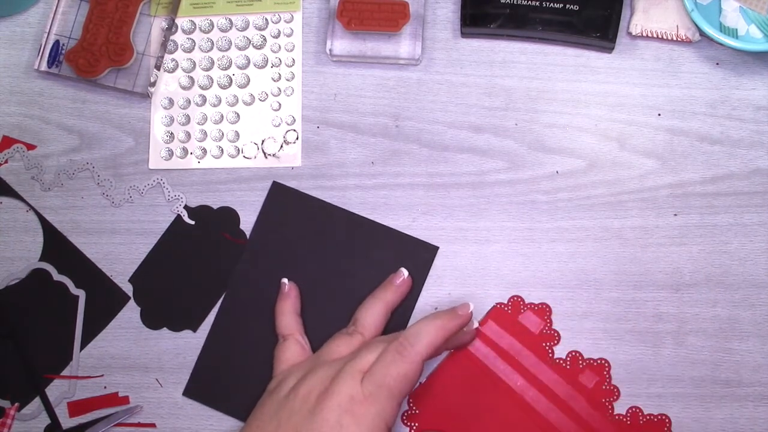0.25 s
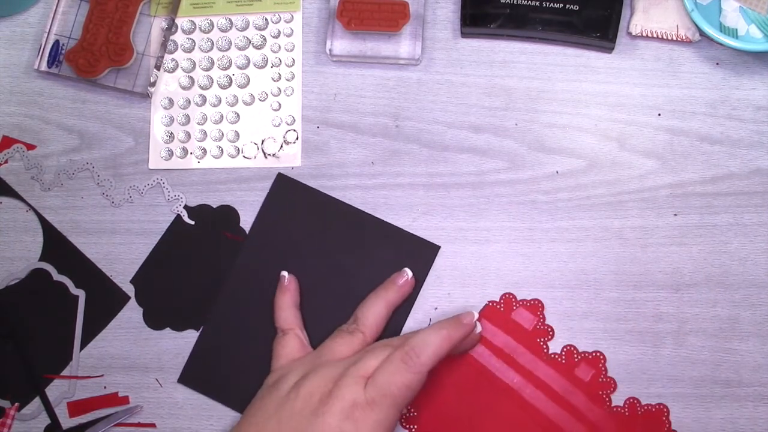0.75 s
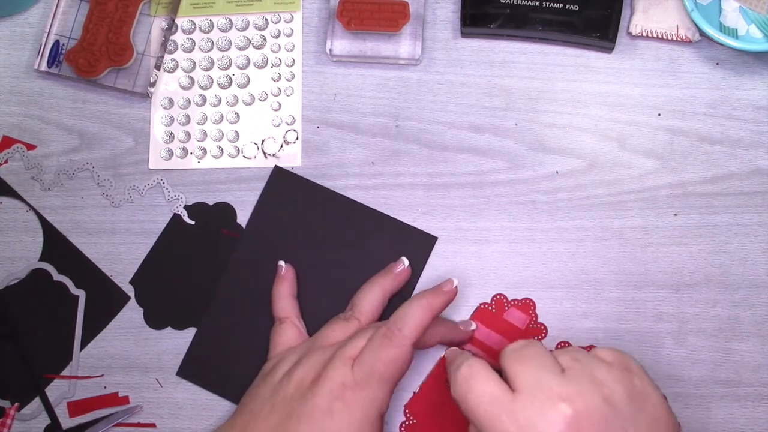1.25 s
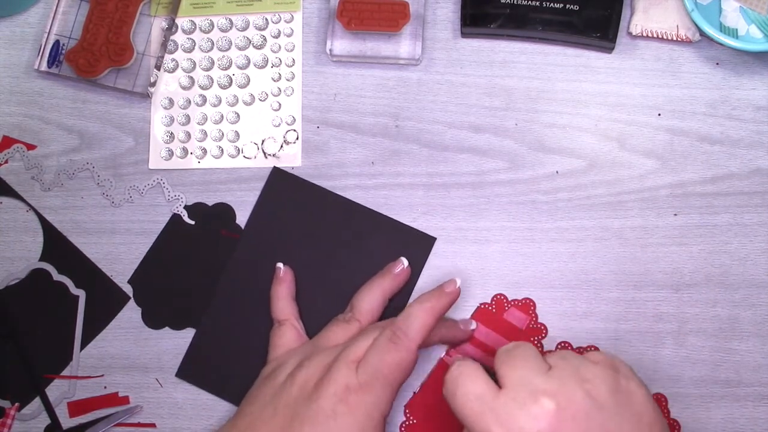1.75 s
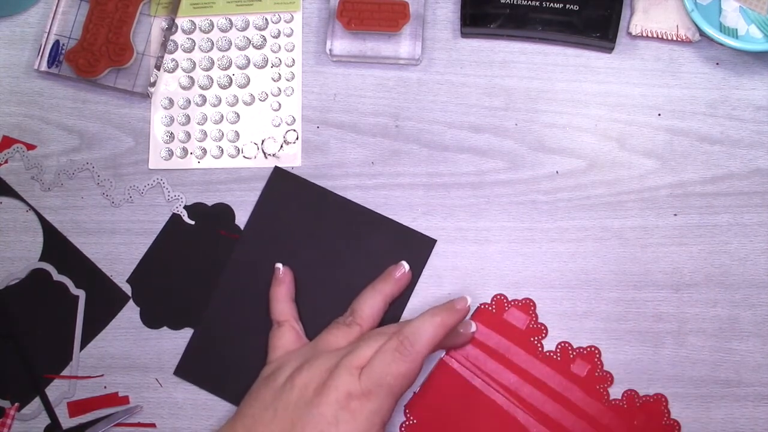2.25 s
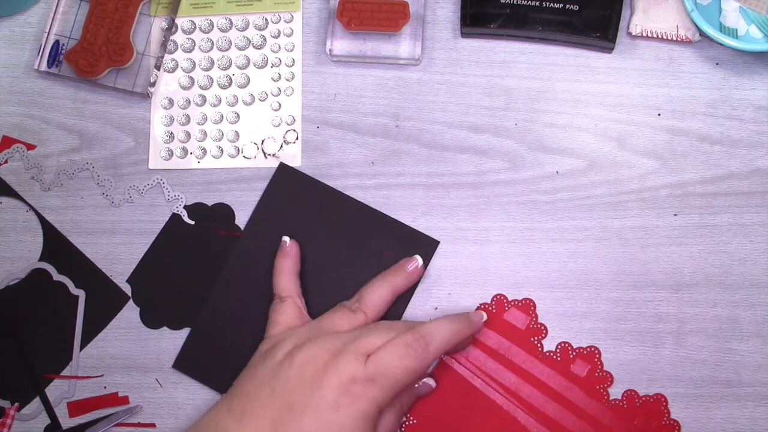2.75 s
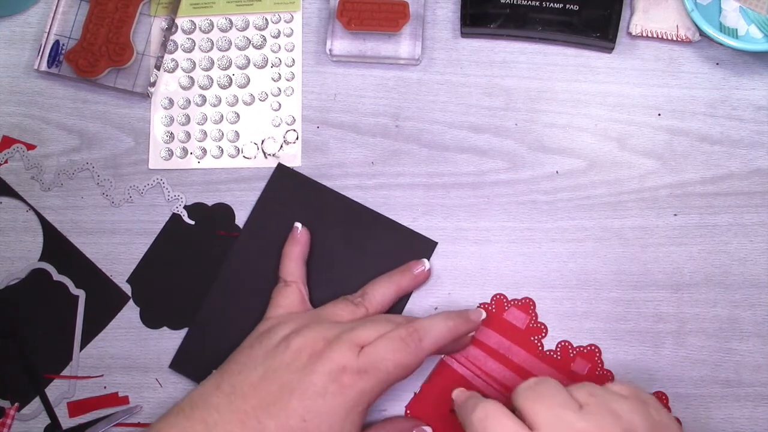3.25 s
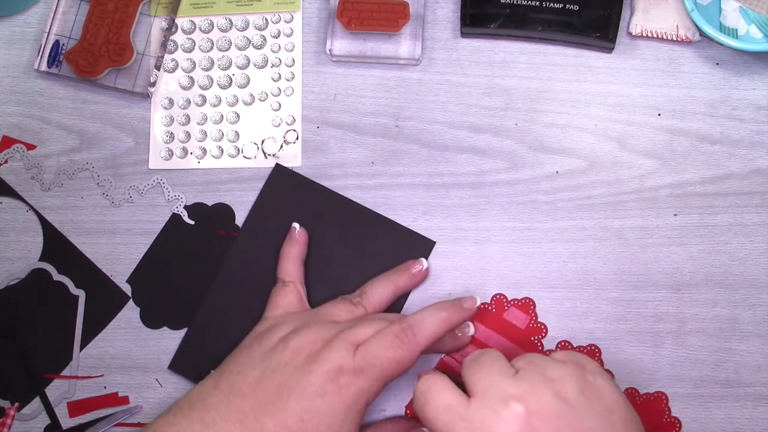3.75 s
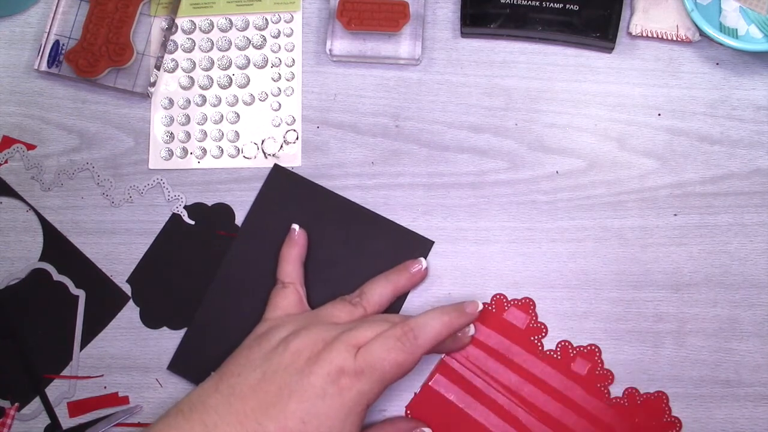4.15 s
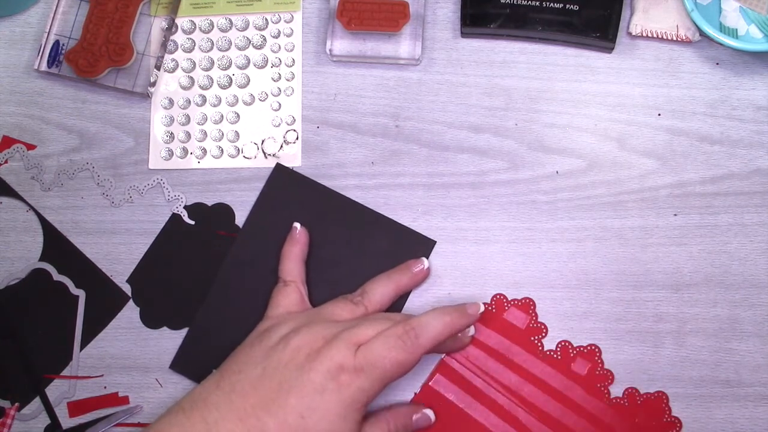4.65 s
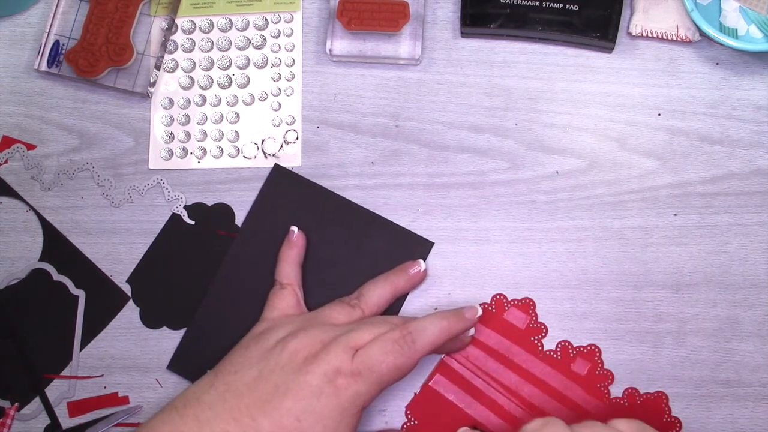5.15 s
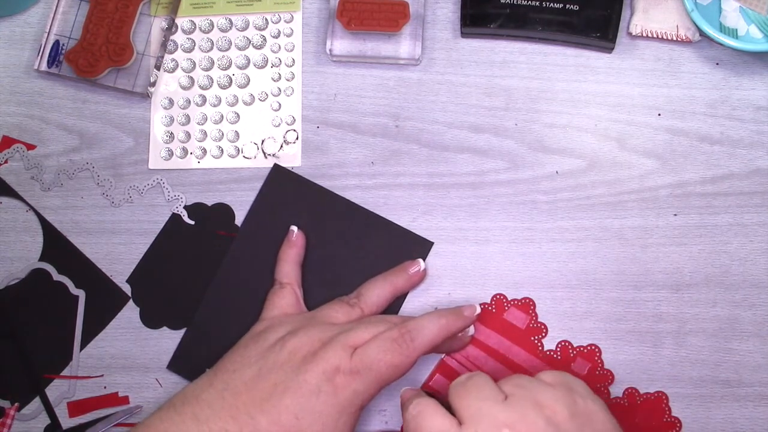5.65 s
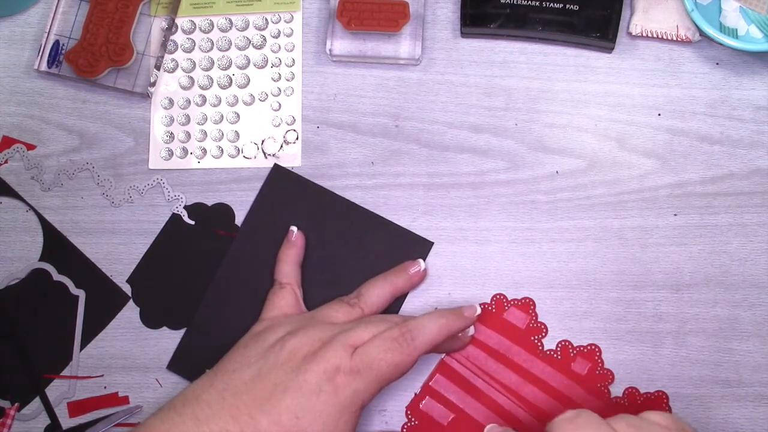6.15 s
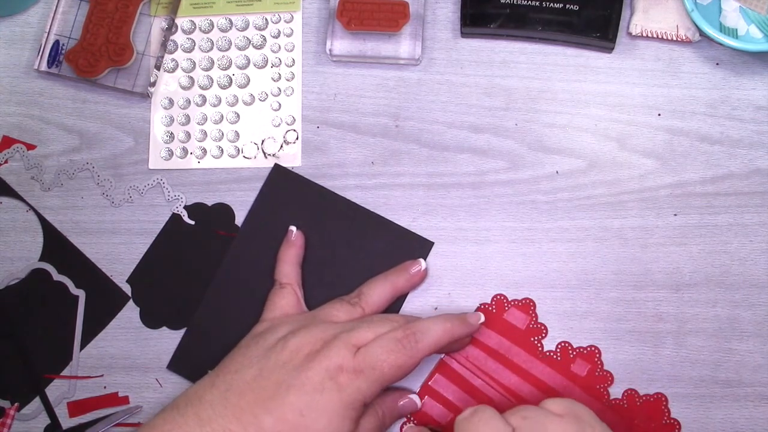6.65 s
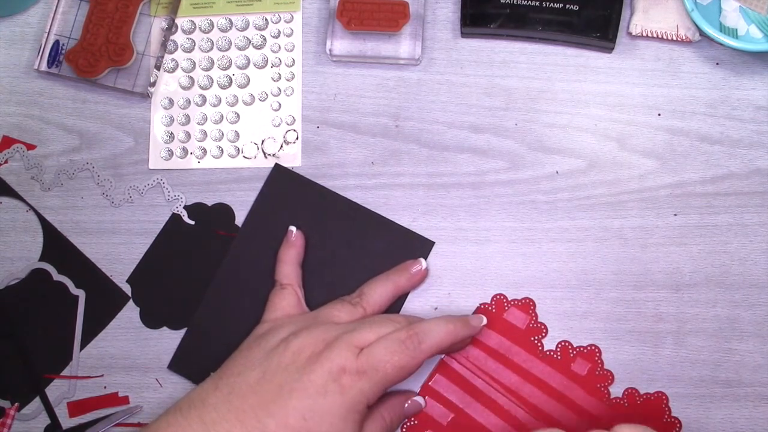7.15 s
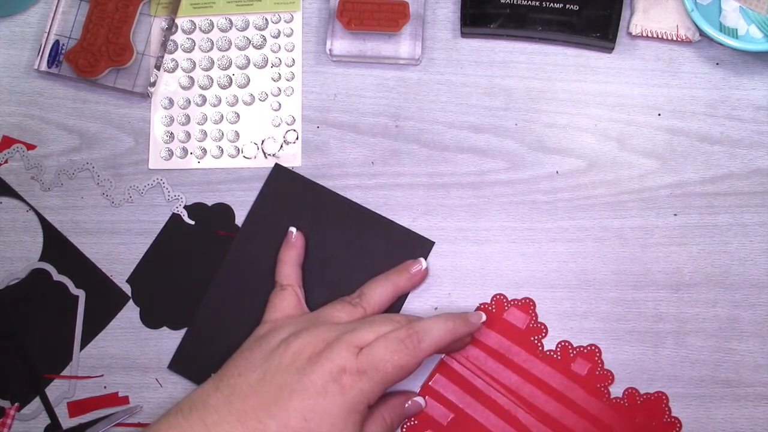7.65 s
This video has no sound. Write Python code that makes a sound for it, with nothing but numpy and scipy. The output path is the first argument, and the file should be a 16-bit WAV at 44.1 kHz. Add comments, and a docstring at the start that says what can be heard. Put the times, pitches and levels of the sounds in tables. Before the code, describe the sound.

A plastic tape runner is already mid-pull, its ratchet buzz slowing to a few clicks, then a hard tap. Two longer rasping pulls follow, each winding down into spaced snaps, then a very short burst. Light ticks and paper rustles fill the gaps, and a pair of hard taps comes near the end. Close stereo microphones, small room, low steady ventilation.

```python
"""A fast ratchet buzz is already running, over a ventilation drone and a faint stepping tick; it ends within 0.4 s.
More pulls follow as a plastic tape runner rolls over paper on a table below a camera's two close microphones.
Its pawl snaps tooth by tooth: uneven little blows ring the modes of the hollow case, with a treble crack.
Ticks, rustles and hard taps sound as it is set down and lifted; shaped noise makes rolling, hiss and drone.
A small room answers with dense noise tails."""
import sys
import numpy as np
from scipy import signal
from scipy.fft import rfft, irfft
from scipy.io import wavfile
from scipy.ndimage import uniform_filter1d

SR = 44100
rng = np.random.default_rng(int(sys.argv[2]) if len(sys.argv) > 2 else 0)


def output_pcm(signal):
    """Save a mono or channel-first signal as 16-bit PCM at the path in sys.argv[1].

    Samples are clipped to [-1, 1] before scaling.
    """
    pcm = np.clip(np.atleast_2d(signal).T, -1, 1) * 32767
    wavfile.write(sys.argv[1], SR, np.round(pcm).astype(np.int16))


N = 348390  # length in samples
GRAIN = 2048  # length of one struck sound in samples


def undb(db):
    """Amplitude factor of a level in dB."""
    return 10 ** (np.asarray(db) / 20)


def level(x, db):
    """Sets the RMS level of a signal."""
    return x * undb(db) / np.sqrt(np.mean(x ** 2))


def curve(rows):
    """A (t/s, value) table at every sample."""
    return np.interp(np.arange(N) / SR, *np.transpose(rows))


def on_log(rows, hz):
    """A (f/Hz, value) table read on a log-frequency axis."""
    f, value = np.transpose(rows)
    return np.interp(np.log(np.maximum(hz, 1)), np.log(f), value)


def band(x, lo_hz, hi_hz, order=2):
    """Keeps the band between two frequencies."""
    sos = signal.butter(order, [lo_hz, min(hi_hz, .49 * SR)], "bandpass", fs=SR, output="sos")
    return signal.sosfilt(sos, x)


def walk(rate):
    """Random values, rate per second, joined by slewing; spread near 1."""
    hold = int(SR / rate)
    steps = np.repeat(rng.standard_normal(N // hold + 1), hold)
    return 1.2 * uniform_filter1d(steps, hold)[:N]


# spectrum of the ventilation drone: (f/Hz, relative level/dB per Hz)
DRONE_SPECTRUM = [(20, -50), (40, -24), (69, -29), (89, -6), (109, -1), (130, -8), (204, -10), (354, -10),
                  (600, -16), (965, -18), (1550, -25), (2770, -28.5), (5000, -36.5), (11300, -53.5),
                  (16000, -85)]
# left-right likeness of the drone: (f/Hz, likeness 0-1)
DRONE_LIKENESS = [(30, 0.54), (80, 0.98), (130, 0.99), (290, 0.7), (640, 0.62), (1400, 0.64), (3100, 0.5),
                  (15000, 0.52)]


def drone():
    """Ventilation: coloured noise, its left-right likeness set by frequency, under a thin high whine."""
    f = np.arange(N // 2 + 1) * SR / N
    alike = np.clip(on_log(DRONE_LIKENESS, f), 0, 1)
    colour = undb(on_log(DRONE_SPECTRUM, f))
    mid, side = rfft(rng.standard_normal((2, N))) * colour * np.sqrt([1 + alike, 1 - alike])
    air = irfft(np.array([mid + side, undb(0.7) * (mid - side)]), N)
    whine_hz = 11050
    whine = band(rng.standard_normal(N), whine_hz - 90, whine_hz + 90)
    return level(air, -53.5) * undb(0.35 * walk(2.88)) + level(whine, -82)


# runs of the stepping tick: (first t/s, last t/s, nominal peak level/dB)
STEP_RUNS = [(.94, 1.22, -50), (3.27, 3.63, -49.5), (5.2, 5.56, -51.5), (6.07, 6.45, -59),
             (6.54, 6.6, -47.5)]


def ticker():
    """Perhaps a lens motor: even clicks near 2.7 kHz; each run starts with a stronger one."""
    start_s, period_s = .0107, .06673
    clicks = np.zeros(N)
    s = np.arange(start_s, N / SR, period_s)
    size = undb(1.4 * rng.standard_normal(len(s)))
    for first, last, db in STEP_RUNS:
        on = (s > first) & (s < last)
        opening_db = 3.8 * (s[on] < first + period_s)
        clicks[(s[on] * SR).astype(int)] = size[on] * undb(db + opening_db)
    one_click = band(np.eye(1, 200)[0], 2300, 3200)
    return band(clicks, 2300, 3200) / np.abs(one_click).max()


# fading of the room, band by band: (centre f/Hz, time to fall 60 dB t/s, relative level/dB)
ROOM_BANDS = [(1513, 0.29, -5.5), (2810, 0.28, -9.5), (4930, 0.37, -6), (8400, 0.33, -11),
              (12700, 0.32, -17.5)]


def room(x, gap_s, apart_db):
    """Dense reflections after a short gap, fading band by band; the close ports hear them nearly alike."""
    t = np.arange(SR // 2) / SR
    onset = np.clip(2 * t / gap_s - 1, 0, 1)  # silent to half the gap, full at its end
    tails = 0
    for hz, t60, db in ROOM_BANDS:
        noise = band(rng.standard_normal((2, len(t))), hz / 1.25, hz * 1.216)
        noise *= np.exp(-np.log(1000) * t / t60) * onset
        tails = tails + undb(db) * noise / np.sqrt(np.sum(noise[0] ** 2) * SR / hz)
    # the ports are set apart around 5.5 kHz
    side = undb(apart_db) * band(tails[1], 4600, 6600)
    return signal.fftconvolve(x[None], [tails[0] + side, tails[0] - side], axes=1)[:, :N]


def diffuse(x, share, flutter_hz):
    """Random flutter on the sound sent to the room, so narrow rings give diffuse tails."""
    share = np.clip(share, 0, 1)
    flutter = level(band(rng.standard_normal(N), 28, flutter_hz), 0)
    return x * (np.sqrt(1 - share) + np.sqrt(share) * flutter)


def ports(x, apart_db):
    """Short waves scatter round the camera body, so the two ports differ a little in the treble."""
    t = np.arange(256) / SR
    scatter = band(rng.standard_normal(len(t)) * np.exp(-t / 0.00043), 3100, 15000)
    scatter /= np.sqrt(np.sum(scatter ** 2))
    side = signal.fftconvolve(x, scatter)[:N] * undb(apart_db)
    return np.array([x + side, x - side])


# soft hiss, perhaps a hand sliding over the paper: (t/s, lower band level/dB, upper band level/dB)
SLIDE_LEVELS = [(0, -53, -57), (.8, -68.5, -64.5), (1.05, -58, -63), (1.3, -69, -67.5), (2.95, -64, -67),
                (3.2, -65.5, -64), (3.45, -69, -68), (4.9, -72, -67), (5.2, -58.5, -65), (5.45, -69, -68.5),
                (6.1, -73, -67.5), (7.9, -79, -68.5)]


def slide():
    """Soft hiss: two bands of noise that follow drawn levels and flicker a little."""
    s, low_db, high_db = np.transpose(SLIDE_LEVELS)
    soft = level(band(rng.standard_normal(N), 790, 1670), 0) * undb(curve(np.c_[s, low_db]))
    airy = level(band(rng.standard_normal(N), 1300, 7200, order=1), 0) * undb(curve(np.c_[s, high_db]))
    return (soft + airy) * undb(0.76 * walk(30))


def roller(s, rumble_db, rub_db):
    """Low rumble through the table and a rub on the paper, stronger the faster the teeth pass."""
    passing = np.zeros(N)
    passing[(np.maximum(s, 0) * SR).astype(int)] = 1
    smooth = uniform_filter1d(uniform_filter1d(passing, size=2600), size=2600)
    teeth_per_s = np.abs(smooth) * SR
    rumble = level(band(rng.standard_normal(N), 137, 423), rumble_db)
    rub = level(band(rng.standard_normal(N), 610, 1010), rub_db)
    # the two levels are those at 70 teeth per second
    return (rumble + rub) * (teeth_per_s / 70) ** 0.82 * undb(2.0 * walk(40))


def contact(count, chatter_s, rattle, spike_db):
    """A few ms of uneven little blows, then a weak after-rattle; the sum drives all frequencies nearly alike."""
    t = np.arange(GRAIN // 2) / SR
    chance = rng.standard_normal((count, 2 * len(t) + 1))
    length = chatter_s * np.exp(.22 * chance[:, [-1]])
    fall = np.exp(-(t / length) ** 2) + rattle * np.exp(-t / 0.0088)
    shape = (1 - np.exp(-t / 0.00089)) * fall
    blows = chance[:, :len(t)] * undb(spike_db * chance[:, len(t):-1])
    push = rfft(shape * blows, GRAIN)
    push /= uniform_filter1d(np.abs(push) ** 2, size=24, axis=1) ** .35  # evens out the spectrum
    # lead-in of 128 samples keeps the rise of each blow whole
    return np.roll(irfft(push, GRAIN), 128, axis=1)[:, :GRAIN // 2]


def ring(push, modes, balance_db, stretch, scatter_db, detune):
    """Each push rings resonant modes with its own balance and slight detuning, scaled to one short-term peak."""
    hz, width, db = np.transpose(modes)
    count = len(hz)
    chance = rng.standard_normal((len(push), 2 * count))
    gain = undb(db + balance_db + scatter_db * chance[:, :count]) * (-1) ** np.arange(count)
    centre = hz * stretch[:, None] * (1 + detune * chance[:, count:])
    f = np.arange(GRAIN // 2 + 1) * SR / GRAIN
    response = 0
    for k in range(count):
        damping = width[k] * f
        response = response + gain[:, [k]] * damping / (damping + 1j * (f ** 2 - centre[:, [k]] ** 2))
    out = irfft(rfft(push, GRAIN) * response, GRAIN)
    power = uniform_filter1d(2 * out ** 2, size=90, axis=1)
    return out / np.sqrt(power.max(axis=1, keepdims=True))


# treble modes shared by every blow: (f/Hz, width/Hz, relative level/dB)
TREBLE_MODES = [(5500, 1600, 3.5), (7240, 640, 6), (8100, 510, 4), (10560, 1340, 1), (12500, 2240, -1.5)]


def place(table, push, body):
    """Adds the treble ring to the body ring and puts each blow at its moment."""
    s, db, rel_db, _ = np.transpose(table)
    treble = ring(push, TREBLE_MODES, 0, 1 + 0 * s, scatter_db=1.5, detune=0.027)
    grains = undb(db)[:, None] * (body + undb(rel_db)[:, None] * treble)
    out = np.zeros(N + 2 * GRAIN)
    starts = ((s - .0008) * SR).astype(int) + GRAIN - 128
    for start, grain in zip(starts, grains):
        out[start:start + GRAIN] += grain
    # the case is too small to radiate below its first mode
    sos = signal.butter(5, 1130, "highpass", fs=SR, output="sos")
    return signal.sosfiltfilt(sos, out[GRAIN:GRAIN + N])


# modes of the hollow case: (f/Hz, width/Hz, relative level/dB)
CASE_MODES = [(1242, 171, 2), (1335, 162, 2), (1482, 142, 3), (1860, 235, -6.5), (2214, 135, -6),
              (3010, 298, -4.5), (3800, 350, -5), (4528, 183, -6)]
# starts of the pulls, the first before the sound begins: (t/s)
PULL_STARTS = [-.35, 1.65, 3.74, 5.75]


def case(table, chatter_s, rattle, spike_db):
    """Blows on the case; a higher centre leans the modes upward, and those near 2 kHz swell along a pull."""
    s, centre_hz = np.array(table)[:, [0, 3]].T
    octave = np.log2(np.array(CASE_MODES)[:, 0] / 2100)
    pull_start = np.array(PULL_STARTS)[np.searchsorted(PULL_STARTS, s) - 1]
    along = np.clip((s - pull_start) / 0.41, 0, 1)
    lean_db = 13.2 * np.outer(np.log2(centre_hz / 2150), octave)
    swell_db = 14.4 * np.outer(along - .5, np.exp(-(octave / 0.44) ** 2))
    push = contact(len(table), chatter_s, rattle, spike_db)
    body = ring(push, CASE_MODES, lean_db + swell_db, 1 + 0 * s, scatter_db=1.9, detune=0.027)
    return place(table, push, body)


# rustles of paper: (start t/s, end t/s, tick level/dB, treble minus body level/dB)
PAPER_RUSTLES = [(.83, 0.887, -50, -14), (1.51, 1.566, -42, -15), (2.76, 2.87, -49.5, -10),
                 (4.682, 4.78, -43, -6), (5.958, 6.018, -41.5, -8), (6.778, 6.838, -49, -16),
                 (6.919, 6.98, -44, -8), (7.027, 7.08, -48, -4), (7.797, 7.846, -50, -14)]


def rustle(scatter_db, centre_hz, spread_oct):
    """Paper: small ticks scattered at uneven moments inside each rustle, struck like the case."""
    per_s = 70
    rows = []
    for start, end, db, rel_db in PAPER_RUSTLES:
        slots = np.arange(start, end, 1 / per_s)
        when, strong, high = rng.standard_normal((len(slots), 3)).T
        rows.append(np.c_[slots + np.tanh(when) / per_s / 2, db + scatter_db * strong,
                          rel_db + 0 * slots, centre_hz * 2 ** (spread_oct * high)])
    return case(np.vstack(rows), chatter_s=0.0025, rattle=0.18, spike_db=3.0)


# light ticks of case and paper: (t/s, level/dB, treble minus body level/dB, centre of the body ring f/Hz)
LIGHT_TICKS = [(.6124, -29, -6.5, 3270), (.6325, -33, -20, 3120), (.847, -41.5, -11, 2090),
               (.9888, -46.5, -11, 2830), (1.3741, -44, -13, 1980), (1.5408, -33, -10, 1700),
               (1.6258, -32, -19, 1428), (1.646, -31, -19, 1850), (1.6755, -28, -11, 1840),
               (2.646, -36.5, -6.5, 3260), (2.6771, -39, -14, 3200), (2.7109, -36, -10, 2080),
               (2.7414, -34, -8.5, 2360), (2.7639, -35, -12, 1960), (2.7813, -35, -5.5, 2130),
               (2.8039, -37, -12, 2030), (2.9478, -38.5, -9, 2400), (2.9696, -42, -7, 2590),
               (3.7085, -35.5, -16, 1560), (4.6724, -32.5, -9.5, 3400), (4.6866, -37, -20, 3060),
               (4.7368, -40, -3, 2530), (4.7526, -40, -20, 1960), (4.8529, -43.5, -14, 1874),
               (5.6265, -38.5, -10, 3330), (5.678, -29.5, -11, 1840), (5.7153, -33, -14, 1700),
               (5.7444, -31, -12, 2450), (5.933, -29.5, -31, 1760), (6.738, -50.5, -15, 3000),
               (6.8151, -38.5, -30, 1805), (6.8271, -48, -25, 3100), (6.8959, -38, -4, 2910),
               (7.047, -43, 1, 2600), (6.9581, -34, -1, 2720), (7.5168, -43, -5, 2560),
               (7.6127, -36.5, -10, 1765), (7.822, -48, -2, 2510)]


def ticks():
    """Light ticks: short chatter with little after-rattle rings the case."""
    return case(LIGHT_TICKS, chatter_s=0.0021, rattle=0.11, spike_db=4.0)


# modes of a hard tap before scaling to its main ring: (f/Hz, width/Hz, relative level/dB)
TAP_RING = [(1970, 186, 3), (1480, 270, -14.5), (3700, 250, -9.5), (4460, 400, -10.5)]
# single hard taps: (t/s, level/dB, treble minus body level/dB, main ring f/Hz)
HARD_TAPS = [(0.6519, -15.5, -8, 1550), (7.021, -29.5, 3.5, 3820), (7.6396, -13.5, -14, 1855),
             (7.6788, -14, -14.5, 1940)]


def taps():
    """Hard taps: very short chatter, a narrow main ring and three weaker ones."""
    main_hz = np.array(HARD_TAPS)[:, 3]
    push = contact(len(HARD_TAPS), chatter_s=0.0014, rattle=0.092, spike_db=3.0)
    body = ring(push, TAP_RING, 0, main_hz / TAP_RING[0][0], scatter_db=2.0, detune=0)
    return place(HARD_TAPS, push, body)


# turning of the ratchet wheel, one table for each of the three running pulls: (t/s, teeth turned)
WHEEL_TURNS = [
    [(-.006, 0), (.0099, 1), (.0565, 4), (.151, 10), (.1687, 11), (.2285, 14), (.2754, 16)],
    [(1.7005, 0), (1.7326, 2), (1.7864, 5), (1.8015, 6), (1.8642, 11), (1.9657, 19), (2.0004, 22),
     (2.0678, 27), (2.0839, 28), (2.1577, 32), (2.1807, 33)],
    [(3.767, 0), (3.7849, 1), (3.8479, 5), (3.8844, 7), (3.9394, 11), (3.9577, 13), (4.0191, 18),
     (4.046, 20), (4.0987, 24), (4.129, 26), (4.1395, 27), (4.1615, 28), (4.2249, 31), (4.2612, 33)],
]
# running teeth along those pulls: (t/s, level/dB, treble crack level/dB, centre of the body ring f/Hz)
RUNNING_SOUND = [(0, -19.5, -27.5, 2320), (.07, -21.5, -29, 2400), (.135, -18.5, -29, 2570),
                 (.19, -23.5, -30, 2400), (.28, -24, -33.5, 2700), (1.7, -18.5, -29, 1770),
                 (1.77, -21, -29, 2230), (1.865, -17.5, -28, 2010), (1.96, -22, -29, 2250),
                 (2.05, -16.5, -28, 2000), (2.12, -17.5, -29.5, 2120), (2.18, -20, -29, 2120),
                 (3.77, -20.5, -31, 2200), (3.83, -20.5, -28.5, 2180), (3.867, -17, -28.5, 1750),
                 (3.92, -21.5, -27.5, 2250), (4.025, -16, -26.5, 1880), (4.1, -19.5, -26, 2200),
                 (4.17, -19.5, -28.5, 2170), (4.26, -16, -28.5, 1990)]
# snaps listed one by one: pull starts and ends, the short fourth pull, two single snaps:
# (t/s, level/dB, treble crack level/dB, centre of the body ring f/Hz)
LISTED_SNAPS = [(0.3038, -23.5, -31.5, 2270), (0.335, -22.5, -30.5, 2320), (.3699, -19, -31.5, 2260),
                (.4202, -20, -30, 2070), (1.654, -20, -41, 1680), (1.683, -16.5, -27.5, 1560),
                (2.207, -19, -27.5, 2140), (2.2352, -18.5, -27.5, 2220), (2.2607, -18.5, -28.5, 2210),
                (2.293, -19.5, -28, 2270), (2.3465, -21, -28.5, 2340), (2.4044, -21, -28, 2230),
                (2.463, -21.5, -27.5, 2600), (2.5407, -22, -33.5, 2330), (3.743, -21, -31, 2090),
                (4.288, -16.5, -30, 1920), (4.3181, -18.5, -28, 1980), (4.3507, -18, -32, 2200),
                (4.3813, -22.5, -30.5, 2520), (4.432, -19.5, -33, 1800), (4.5245, -22.5, -26, 2590),
                (5.7584, -19, -32, 1770), (5.7824, -18, -31, 2000), (5.7981, -19, -29, 2250),
                (5.812, -18, -31, 2070), (5.835, -15, -27.5, 1900), (5.9456, -22, -30.5, 1953),
                (6.9104, -19.5, -29.5, 2490), (6.9897, -21, -27.5, 2940)]


def teeth():
    """The pawl snaps at every whole tooth; rows (t/s, level/dB, treble minus body level/dB, centre f/Hz)."""
    moments = []
    for pull in WHEEL_TURNS:
        at, turned = np.transpose(pull)
        moments.append(np.interp(np.arange(turned[-1] + 1), turned, at))
    s = np.concatenate(moments)
    at, *sound = np.transpose(RUNNING_SOUND)
    db, crack_db, hz = (np.interp(s, at, column) for column in sound)
    late, strong, crisp, high = rng.standard_normal((len(s), 4)).T
    extra_db = 1.37 * strong
    centre_oct = -0.22 * extra_db + 0.12 * high  # stronger teeth ring lower
    # the treble crack does not follow the strength of the ring
    running = np.c_[s + .0006 * late, db + extra_db, crack_db + crisp, hz * 2 ** centre_oct]
    s, db, crack_db, hz = np.vstack([running, LISTED_SNAPS]).T
    return np.c_[s, db, crack_db - db, hz]


def scene():
    """Sums the close blows, their room echo, the rolling and the background."""
    snaps = teeth()
    near = case(snaps, chatter_s=0.0041, rattle=0.36, spike_db=3.5)
    near += ticks()
    near += rustle(scatter_db=2.5, centre_hz=2280, spread_oct=0.36)
    knocks = taps()
    # the taps have a slightly weaker room echo
    to_room = diffuse(near + undb(-1.5) * knocks, share=.45, flutter_hz=358)
    echo = room(to_room, gap_s=0.009, apart_db=-8.5)
    rolling = roller(snaps[:, 0], rumble_db=-52.5, rub_db=-56)
    return ports(near + knocks, apart_db=-27) + echo + rolling + slide() + ticker() + drone()


def record(dry):
    """The camera cuts the top steeply above 15.9 kHz."""
    return signal.sosfilt(signal.ellip(10, .2, 70, 15900, fs=SR, output="sos"), dry)


dry = scene()
out = record(dry)
output_pcm(out)
```